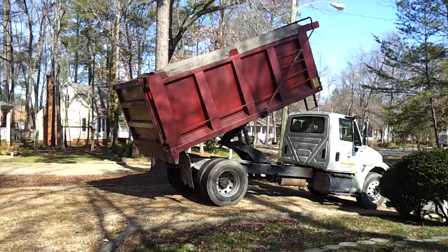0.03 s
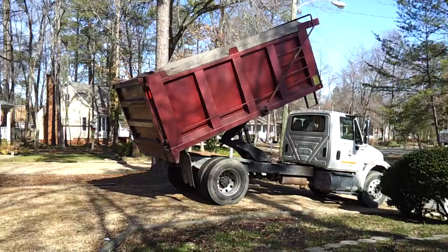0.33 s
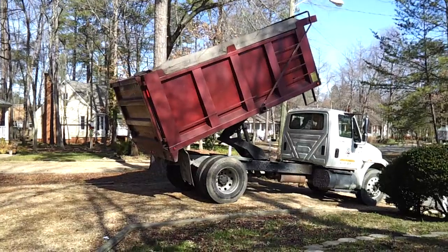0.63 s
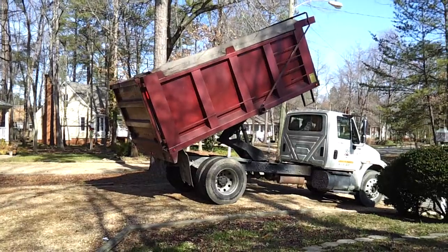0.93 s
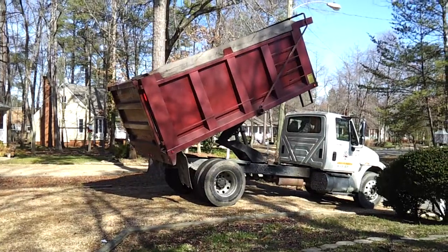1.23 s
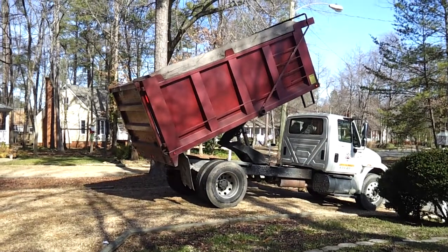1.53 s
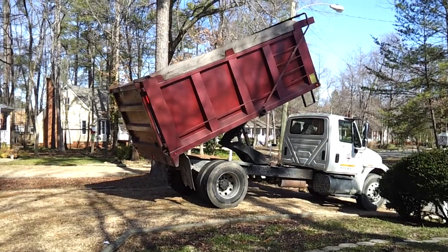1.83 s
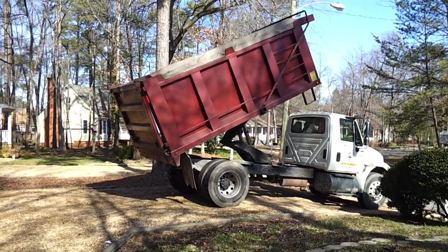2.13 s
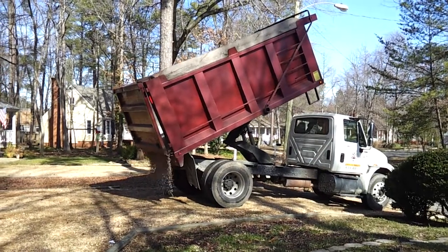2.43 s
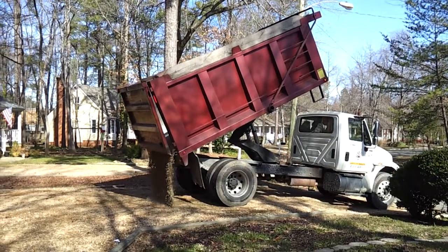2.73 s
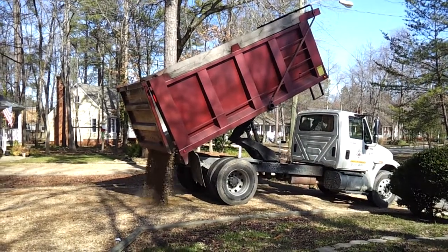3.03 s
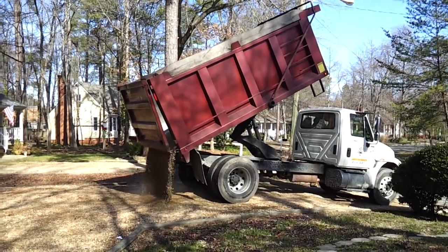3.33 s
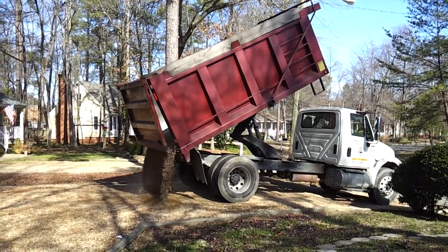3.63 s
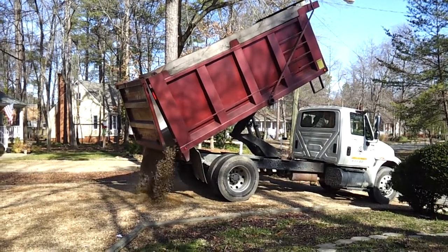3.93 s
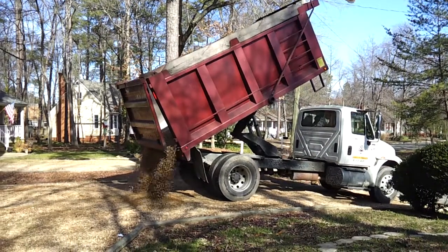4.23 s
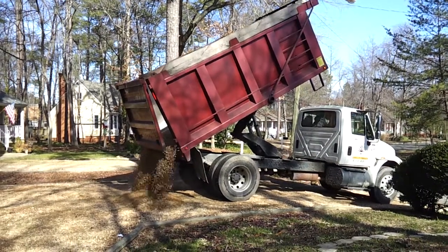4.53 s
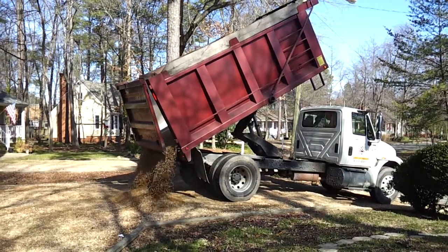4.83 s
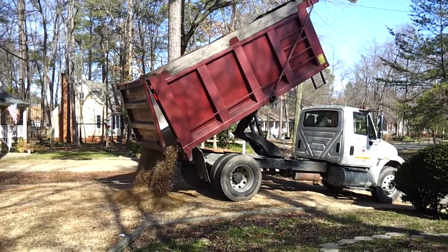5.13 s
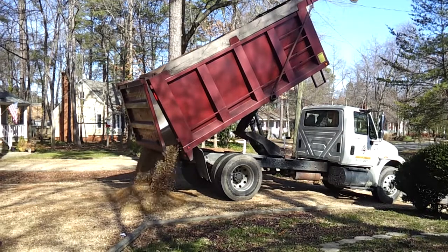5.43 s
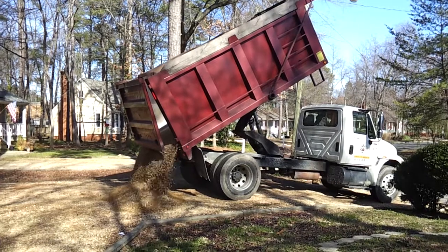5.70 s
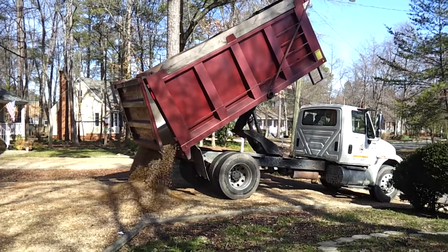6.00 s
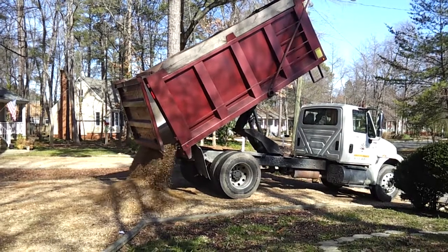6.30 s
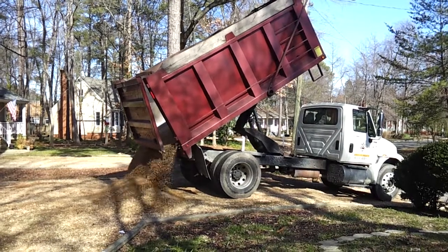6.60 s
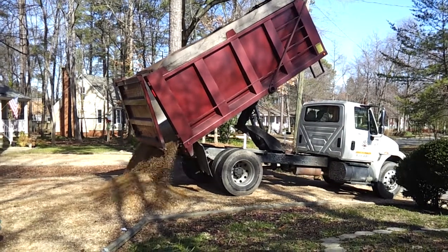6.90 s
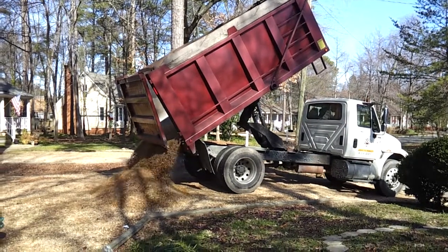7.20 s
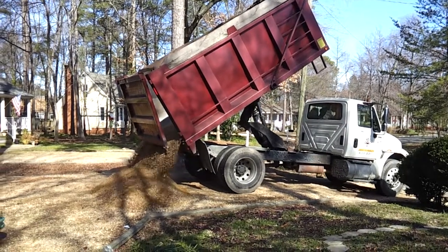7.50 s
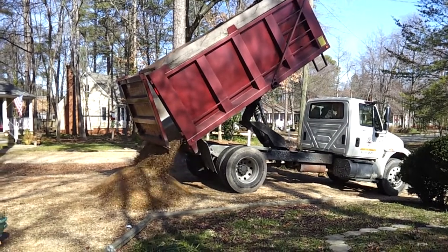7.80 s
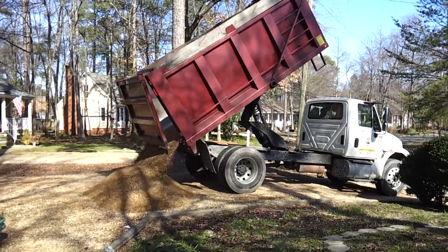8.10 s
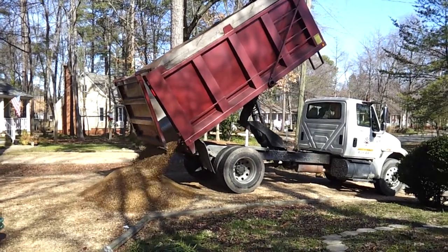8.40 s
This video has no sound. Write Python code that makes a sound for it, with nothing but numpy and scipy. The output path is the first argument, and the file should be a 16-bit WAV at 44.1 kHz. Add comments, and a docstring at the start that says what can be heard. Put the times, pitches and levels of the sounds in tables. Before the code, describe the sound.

A diesel dump truck idles as gravel starts sliding down its steel bed and pours onto the ground, growing very loud.

```python
"""Gravel pours from a dump truck that idles while its hydraulic pump slowly tips the bed.
Stones slip, creep and scrape over the ringing steel floor, spill from the tailgate,
spatter on the ground and build a heap; each sound is a stream of random impacts, filtered.
The diesel is exhaust tones plus noise pulsed at each firing; the pump hums, geared to the crank.
The pour swells until it distorts."""
import sys
import numpy as np
from scipy import signal
from scipy.fft import rfft, irfft, next_fast_len
from scipy.io import wavfile

SR = 44100
rng = np.random.default_rng(int(sys.argv[2]) if len(sys.argv) > 2 else 0)


def store_pcm(level_fs):
    """Save levels as 16-bit WAV."""
    pcm = np.round(np.clip(level_fs, -1, 1) * 32767).astype(np.int16)
    wavfile.write(sys.argv[1], SR, np.atleast_2d(pcm).T)


N = 377055

RELEASE_S, LANDING_S = 2.032, 2.47  # load gives way; stream reaches the ground
TREBLE_TOP_HZ = 11800


def from_db(db):
    """Decibels to gain."""
    return 10 ** (np.asarray(db) / 20)


def rms_one(x):
    """Scale to rms 1."""
    return x / np.sqrt(np.mean(x ** 2) + 1e-20)


def since(start_s):
    """Seconds since start_s, zero before."""
    return np.maximum(np.arange(N) / SR - start_s, 0)


def ramp(start_s, length_s):
    """Linear rise from 0 to 1, then held."""
    return np.minimum(since(start_s) / length_s, 1)


def bump(centre_s, width_s):
    """Gaussian swell of height 1."""
    return np.exp(-((since(0) - centre_s) / width_s) ** 2)


def drift(rate_hz):
    """Slow random wander, rms about 1."""
    hop, warmup = 40, 2000
    pole = np.exp(-2 * np.pi * rate_hz * hop / SR)
    noise = rng.standard_normal(N // hop + warmup + 2)
    slow = signal.lfilter([1], [1, -2 * pole, pole * pole], noise)[warmup:]
    return np.interp(np.arange(N) / hop, np.arange(len(slow)), rms_one(slow))


def coloured(x, spectrum, resonances=()):
    """Filter x by a broad spectrum with resonant humps; rms 1."""
    size = next_fast_len(N)
    hz = np.maximum(np.fft.rfftfreq(size, 1 / SR), 1)
    points_hz, points_db = np.transpose(spectrum)
    db = np.interp(np.log(hz), np.log(points_hz), points_db)
    for centre_hz, width_hz, lift_db in resonances:
        db = db + lift_db / (1 + (2 * (hz - centre_hz) / width_hz) ** 2)
    skirts = np.minimum(1, hz / points_hz[0]) ** 2 * np.minimum(1, points_hz[-1] / hz) ** 2
    return rms_one(irfft(rfft(x, size) * from_db(db) * skirts, size)[:N])


def low_pass(x, hz):
    """Steep linear-phase treble cut."""
    taps = signal.firwin(1401, hz, window="blackman", fs=SR)
    return signal.fftconvolve(x, taps[None], "same")


def tone(turns):
    """Sine of rms 1, random start phase."""
    return np.sqrt(2) * np.sin(2 * np.pi * (turns + rng.random()))


def knocking(firings, depth, sharpness, uneven_db):
    """Noise that swells at each firing, no two equally strong."""
    stroke = firings.astype(int)
    stroke_db = uneven_db * rng.uniform(-1.6, 1, stroke[-1] + 1)
    burst = np.exp(-sharpness * (firings % 1)) * from_db(stroke_db[stroke])
    return (1 + depth * burst) * rng.standard_normal(N)


def engine(firings, drone_db=-29.0, rumble_db=-30.0, clatter_db=-29.5):
    """Diesel: exhaust drone, block rumble, and combustion clatter that rises under the hoist's load."""
    # exhaust tones: firing_multiple, relative_db
    exhaust_tones = [(1, -4.5), (1.5, -18), (2, 1.3), (2.5, -15), (3, -27), (3.5, -14.5), (4, -19),
                     (4.5, -16), (5, -9.5), (7, -17.5), (8.5, -16)]
    # block rumble spectrum: freq_hz, relative_db
    rumble_spectrum = [(12, -20), (32, -10), (52, 6.5), (95, 0), (150, 5.5), (205, -2), (300, -4),
                       (390, 0.5), (470, -16), (800, -31)]
    # combustion clatter spectrum: freq_hz, relative_db
    clatter_spectrum = [(250, -9), (550, -3), (760, 3.5), (1000, 2), (1700, -4.5), (2550, -7), (3500, -5.5),
                        (4400, -8.5), (5200, -11), (7400, -11), (8700, -15.5), (11000, -15.5), (12000, -25)]
    # ringing peaks that colour the clatter: centre_hz, width_hz, lift_db
    clatter_peaks = [(965, 29, -1), (1120, 41, 2), (2020, 170, 8), (3770, 260, 2), (4670, 240, 3.5)]
    level_db = drone_db + 0.8 * drift(1.0)
    drone = 0
    for multiple, db in exhaust_tones:
        waver_db = 0.8 * np.sqrt(multiple / 2) * drift(3.1)
        drone = drone + from_db(level_db + db + waver_db) * tone(multiple * firings)
    thuds = knocking(firings, depth=1.4, sharpness=3.5, uneven_db=5.5)
    knocks = knocking(firings, depth=0.32, sharpness=2.7, uneven_db=7.0)
    strain_db = 1.95 * ramp(start_s=0.99, length_s=0.73)
    rumble = from_db(rumble_db) * coloured(thuds, rumble_spectrum)
    clatter = from_db(clatter_db + strain_db) * coloured(knocks, clatter_spectrum, clatter_peaks)
    return drone + rumble + clatter


def pump(firings, strokes_per_firing=24 / 7, slip_turns=0.024, rise_db_per_s=0.58, waver_db=1.5):
    """Crank-geared hoist pump: hums louder as the bed rises, strokes wavering under load."""
    # pump tones: stroke_multiple, relative_db
    harmonics = [(1, -40), (2, -43), (3, -42.5), (4, -50)]
    load_db = -0.3 + rise_db_per_s * since(0)
    strokes = strokes_per_firing * firings + slip_turns * drift(2.5)
    return sum(from_db(load_db + db + waver_db * drift(2.5)) * tone(k * strokes) for k, db in harmonics)


def impacts(per_s, spread_db):
    """Random stone contacts, many soft, a few hard; power independent of rate."""
    chance = np.clip(per_s / SR, 1e-4, 1)
    sizes = from_db(spread_db * np.minimum(rng.exponential(1, N), 4))
    hits = rng.random(N) < chance
    return rms_one(hits * sizes * rng.choice([-1, 1], N) / np.sqrt(chance))


def settling(rise_s=0.0083, low_hz=3500):
    """A few stones let go together and come to rest: short bright rustles."""
    # small slips of the load: start_s, gain_db, decay_s
    slips = [(1.075, -37, .03), (1.525, -28, .025), (2.045, -30, 0.052), (2.155, -26, 0.049)]
    envelope = 0
    for start_s, gain_db, decay_s in slips:
        age_s = since(start_s)
        envelope = envelope + from_db(gain_db) * (1 - np.exp(-age_s / rise_s)) * np.exp(-age_s / decay_s)
    band = signal.butter(1, [low_hz, TREBLE_TOP_HZ], "band", fs=SR, output="sos")
    rustle = signal.sosfilt(band, impacts(per_s=2500, spread_db=2.0))
    return envelope * rms_one(rustle)


def creeping(gain_db=-26.5, surge_db=3.5, hold_s=1.2, fade_db_per_s=1.8):
    """Stick-slip rings the floor plate: less once the load runs freely, more at each slump."""
    # floor modes: centre_hz, width_hz, relative_db
    floor_modes = [(846, 230, -13.5), (1300, 250, -11), (2140, 150, -8), (3460, 150, -6.5), (3750, 76, 0.5),
                   (4640, 240, -23)]
    # masses of stones slumping down the bed: centre_s, lift_db
    slumps = [(4.24, 0), (5.15, 7), (6.38, 11), (7.15, 11), (7.82, 8)]
    fade_db = fade_db_per_s * since(RELEASE_S + hold_s)
    slump_db = sum(lift_db * bump(centre_s, width_s=0.11) for centre_s, lift_db in slumps)
    rings = 0
    for hz, width_hz, db in floor_modes:
        drive = from_db(db + surge_db * drift(7.4)) * impacts(per_s=7000, spread_db=2.5)
        rings = rings + signal.lfilter(*signal.iirpeak(hz, hz / width_hz, fs=SR), drive)
    return ramp(RELEASE_S, length_s=0.42) * from_db(gain_db - fade_db + slump_db) * rms_one(rings)


def sliding(flow_db, gain_db=1.48, surge_db=0.22):
    """Stones scrape down the ringing steel bed; more flow, more contacts."""
    # scrape spectrum: freq_hz, relative_db
    spectrum = [(100, -9.5), (350, 0), (520, -4.5), (800, -0.5), (1500, -3.5), (2500, -5.5), (3300, -1),
                (4200, -3), (5100, -3.5), (5600, -0.5), (7000, -3), (7850, -4), (9000, -4.5), (12000, -9)]
    # steel bed resonances: centre_hz, width_hz, lift_db
    bed_modes = [(720, 280, 4), (1350, 430, 5.5), (2120, 580, 9.5), (2880, 390, 6), (3630, 415, 7.5),
                 (4605, 590, 5), (7360, 560, 3.5)]
    flow = from_db(flow_db) * ramp(RELEASE_S, length_s=0.3)
    scrape = coloured(impacts(per_s=100000 * flow, spread_db=1.0), spectrum, bed_modes)
    return flow * from_db(gain_db + surge_db * drift(21)) * scrape


def heap(flow_db, gain_db=-19.0, flow_share=0.28, clump_db=1.1):
    """Clumps land on the growing pile: a dull roar that partly follows the flow."""
    # roar spectrum: freq_hz, relative_db
    spectrum = [(30, -9), (80, -1), (170, 4.5), (300, 3.5), (480, 0), (750, 1), (1300, -1.5), (2200, -7),
                (4000, -31), (9000, -35)]
    level_db = gain_db + flow_share * flow_db + clump_db * drift(14)
    roar = coloured(impacts(per_s=2500, spread_db=3.5), spectrum)
    return ramp(RELEASE_S, length_s=0.77) * from_db(level_db) * roar


def spattering(flow_db, gain_db=-1.0, surge_db=0.5, splash_db=6, cushion_db_per_s=1.5):
    """Falling stones click brightly: a splash on bare ground, then cushioned by the growing heap."""
    # click spectrum: freq_hz, relative_db
    spectrum = [(1500, -18), (5000, -26), (6500, -17), (7850, -9.5), (8270, 0.5), (8950, -8.5), (9600, -3),
                (10300, -3), (11100, -4), (12000, -7)]
    hardness_db = splash_db * bump(LANDING_S + 0.26, width_s=0.094) - cushion_db_per_s * since(LANDING_S)
    level_db = gain_db + flow_db + hardness_db + surge_db * drift(25)
    clicks = coloured(impacts(per_s=12000, spread_db=0.5), spectrum)
    return ramp(LANDING_S, length_s=0.2) * from_db(level_db) * clicks


def scene(firing_hz=35):
    """Truck and gravel, alike in both channels."""
    # gravel flow down the bed: time_s, flow_db
    flow_curve = [(2.1, -24), (2.28, -27), (2.85, -19.5), (3.19, -20), (3.99, -16), (6.13, -11),
                  (7.84, -10), (8.5, -11.5)]
    time_s = since(0)
    firings = firing_hz * time_s  # six cylinders at idle
    flow_db = np.interp(time_s, *np.transpose(flow_curve))
    truck = engine(firings) + pump(firings)
    gravel = settling() + creeping() + sliding(flow_db) + spattering(flow_db) + heap(flow_db)
    return np.array([truck + gravel] * 2)


def record(dry, clip_level=0.78, cutoff_hz=15800):
    """Fade in, top octave cut, peaks clipped, a last treble cut."""
    heard = low_pass(dry * ramp(start_s=0.693, length_s=0.32), TREBLE_TOP_HZ)
    return low_pass(np.clip(heard, -clip_level, clip_level), cutoff_hz)


dry = scene()
out = record(dry)
store_pcm(out)
```